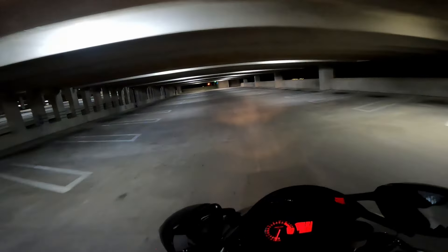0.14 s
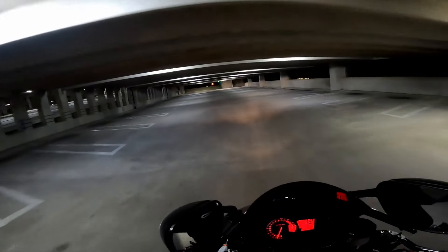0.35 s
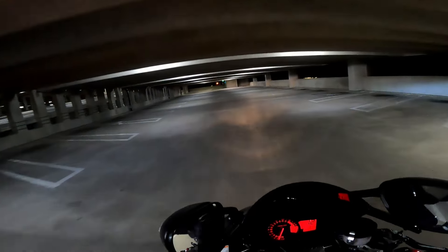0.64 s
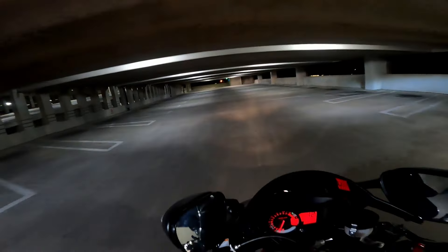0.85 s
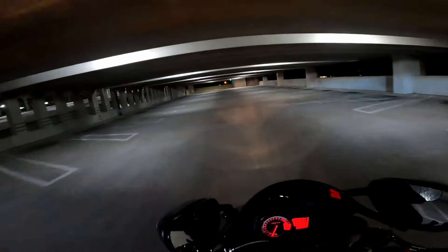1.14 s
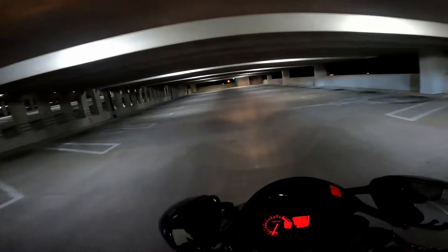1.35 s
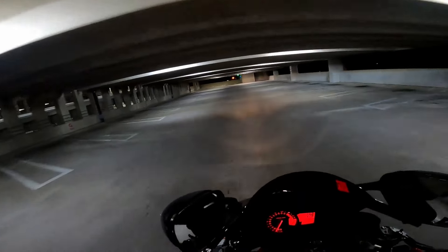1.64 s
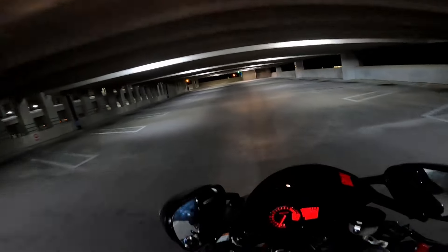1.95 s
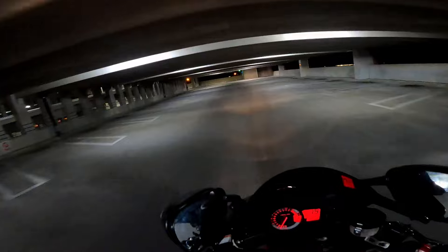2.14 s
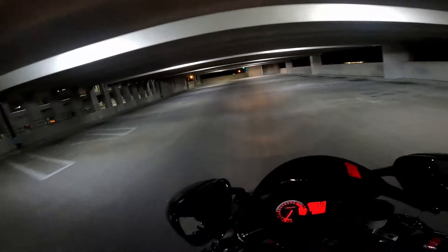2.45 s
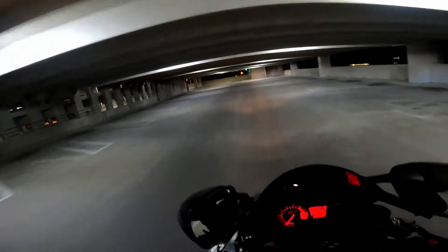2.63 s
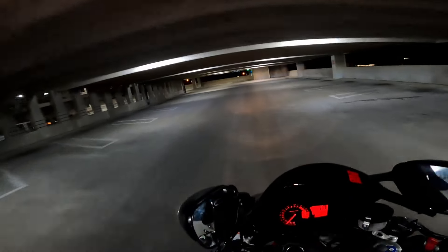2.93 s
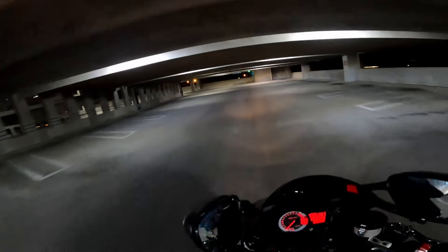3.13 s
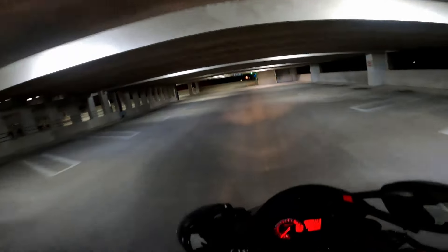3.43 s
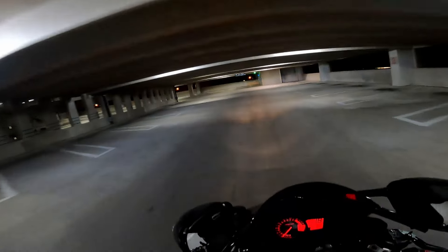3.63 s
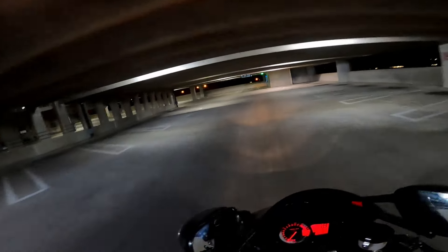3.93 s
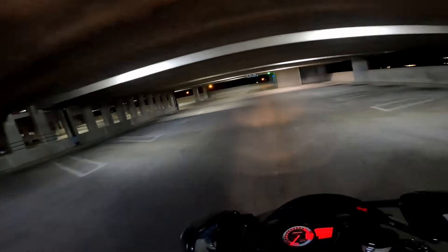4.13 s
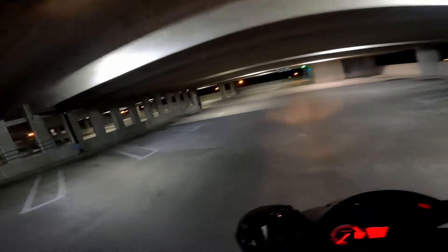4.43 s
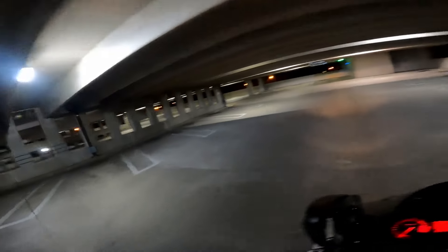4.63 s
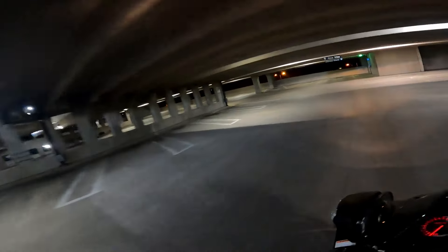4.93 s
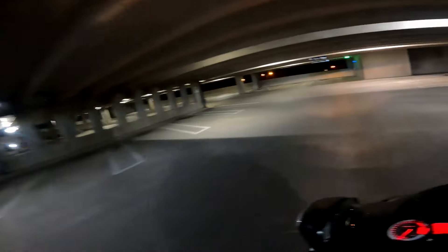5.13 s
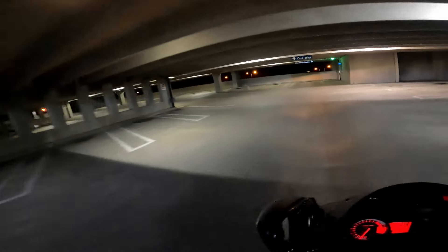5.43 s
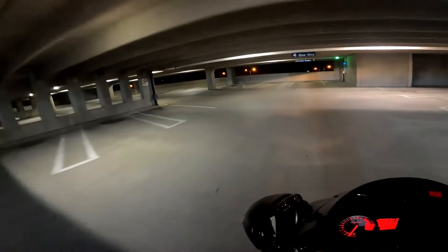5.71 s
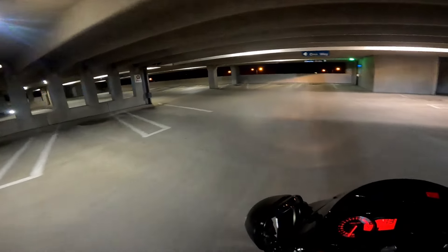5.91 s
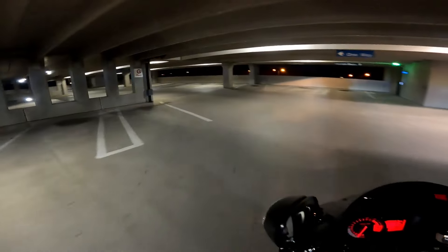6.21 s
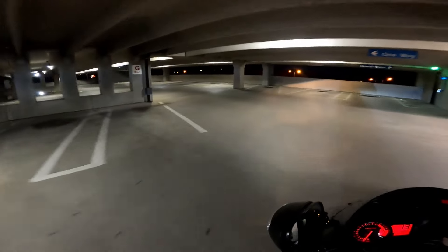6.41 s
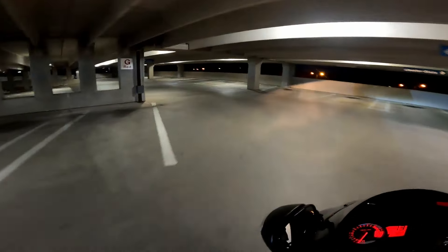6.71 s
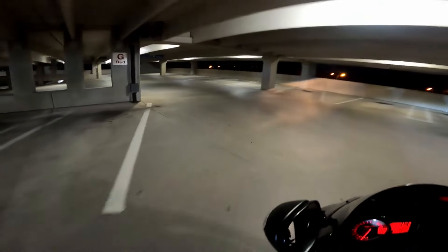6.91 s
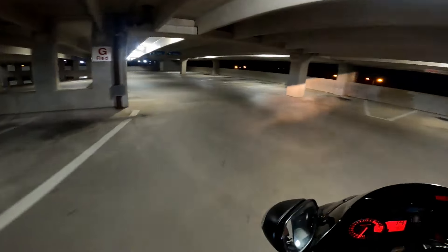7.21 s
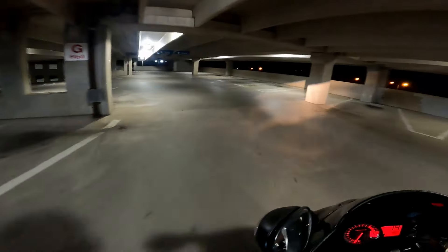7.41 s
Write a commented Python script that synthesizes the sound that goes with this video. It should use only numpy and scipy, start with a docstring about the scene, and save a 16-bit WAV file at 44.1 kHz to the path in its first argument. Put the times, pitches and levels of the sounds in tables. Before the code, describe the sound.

A twin-cylinder sport motorcycle heard from the rider's helmet in a concrete parking garage. The deep droning engine note climbs smoothly for three seconds into a raspy bark, snatches as the throttle closes, then sinks through a bassy, uneven burble with singing gears. Near the end light throttle steadies and slightly lifts the note. Constant mechanical rattle and fluttering concrete reflections surround it.

```python
"""A concrete parking garage, heard from the helmet of a rider on a twin-cylinder sport motorcycle.
It pulls up to about 7900 rpm, coasts down with a burble and whining gears, then takes a little throttle again.
The engine is built from crank orders, firing thumps and gear-tooth tones; filtered noise makes boom, rattle and air.
Beams and pillars return Doppler-shifted echoes that beat against the engine note; a limiter holds the peaks."""
import sys
import numpy as np
from scipy import signal
from scipy.fft import rfft, irfft
from scipy.io import wavfile
from scipy.ndimage import uniform_filter1d, minimum_filter1d

SR = 44100
rng = np.random.default_rng(int(sys.argv[2]) if len(sys.argv) > 2 else 0)


def dump(signal):
    """Clip the signal to [-1, 1] and save it as 16-bit WAV at the path in sys.argv[1]."""
    limited = np.clip(np.atleast_2d(signal).T, -1, 1)
    pcm = np.round(limited * 32767).astype(np.int16)
    wavfile.write(sys.argv[1], SR, pcm)


N = 333396
T = np.arange(N) / SR  # s
HZ = np.fft.rfftfreq(N, 1 / SR)

# crank turns per second at which speed-dependent levels are set, and above which firing grows ragged
STRAIN_HZ = 103
# no two strokes take quite the same time: rms wander of the crank (turns) and its rate (Hz)
WANDER_TURNS, WANDER_HZ = .006, 25


def amp(db):
    """Decibels to gain."""
    return 10 ** (np.asarray(db) / 20)


def unit(x):
    """Scales to rms 1."""
    return x / np.sqrt(np.mean(np.abs(x) ** 2) + 1e-20)


def curve(rows):
    """Every column of a timed table, sample by sample."""
    s, *columns = np.transpose(rows)
    return [np.interp(T, s, column) for column in columns]


def read(points, hz):
    """A spectrum at the given frequencies, interpolated along log frequency."""
    f, value = np.transpose(points)
    return np.interp(np.log(hz + 1), np.log(f + 1), value)


def colour(x, points):
    """Filters by a spectrum, to rms 1."""
    return unit(irfft(rfft(x) * amp(read(points, HZ)), N))


def drift(rate_hz):
    """Smooth chance of rms 1, up to about the given rate."""
    return unit(irfft(rfft(rng.standard_normal(N)) * np.exp(-(HZ / rate_hz) ** 2), N))


def fray(share, rate_hz):
    """A tone's complex gain: partly steady, partly wandering at the given rate."""
    knots = np.arange(0, T[-1] + 1, .5 / rate_hz)
    a, b = rng.standard_normal((len(knots), 2)).T
    wandering = unit(np.interp(T, knots, a + 1j * b))
    return np.sqrt(1 - share) + np.sqrt(share) * wandering


def hump(middle, length):
    """A smooth rise to 1 and fall, as wide as length at half height."""
    return np.exp2(-(2 * (T - middle) / length) ** 2)


def even(x):
    """Levels out the chance lumps of a rumble, keeping its fine grain."""
    window_s, share, floor = .03, .85, .02
    power = signal.oaconvolve((x ** 2).mean(0), signal.windows.hann(int(window_s * SR)), "same")
    return unit(x / (unit(power) + floor) ** (share / 2))


def diffuse(pair):
    """Makes two unrelated noises as alike as a diffuse field at the two microphone ports."""
    # likeness of the ports: frequency_hz, likeness (0-1)
    likeness = [(60, 0.62), (130, 1), (290, 0.85), (640, 0.74), (1410, 0.85), (3100, 0.74), (6820, 0.64),
                (15000, 0.81)]
    a, b = rfft(pair)
    same = np.clip(read(likeness, HZ), 0, 1)
    return irfft(np.array([a, same * a + np.sqrt(1 - same ** 2) * b]), N)


def boom(shut, level_db=-35, shut_db=12, surge_db=-1.0):
    """The space between floor and ceiling resonates below the engine note, most on a shut throttle."""
    # single surges of the low deck: middle_s, length_s, level_db (before surge_db)
    surge_rows = [(0.274, 0.13, -22.5), (1.248, 0.099, -39.5), (4.174, 0.19, -32), (5.554, 0.52, -30.5),
                  (5.91, 0.078, -22.5), (6.457, 0.1, -29.5), (6.954, 0.53, -32.5), (7.523, 0.23, -21.5)]
    # tone of the deck: frequency_hz, relative level (dB per Hz)
    deck_tone = [(8, -29.5), (25, -18.5), (38, -22.5), (50, -4.5), (62, -0.5), (70, 10), (80, -17.5),
                 (120, -36.5), (600, -100)]
    surges = sum(amp(db + surge_db) * hump(s, length) for s, length, db in surge_rows)
    return colour(rng.standard_normal(N), deck_tone) * (amp(level_db + shut_db * shut) + surges)


def clatter(turns, beat=0.029, flicker_db=0.65, waver_db=0.56, waver_hz=14, level_db=12.0):
    """A dense noise of chain, valves and tyres rings metal parts, pulsing slightly with the crank."""
    # level along the ride: time_s, level_db (before level_db is added)
    ride_level = [(0, -47.5), (0.85, -47.5), (2.1, -49), (2.75, -47.5), (3.6, -44), (4.7, -44), (4.95, -45),
                  (5.3, -43.5), (5.9, -44), (6.8, -46), (7.56, -45.5)]
    # tone of chain, valves and tyres: frequency_hz, relative level (dB per Hz)
    rattle_tone = [(300, 11.5), (800, 13.5), (1100, 7.5), (1450, 3), (1950, 4.5), (2600, -0.5), (3800, -5),
                   (4900, -6), (5600, -9), (7400, -14), (8600, -20.5), (11000, -27.5), (12200, -26),
                   (14500, -44.5)]
    # metal parts that the rattle rings: frequency_hz, width_hz, lift_db
    metal_parts = [(960, 33, 3), (1680, 110, 3), (1970, 67, 2.5), (3080, 160, 1.5), (4880, 89, 3.5)]
    pulse = 1 + beat * np.cos(2 * np.pi * turns)
    rattle = rng.standard_normal((2, N)) * pulse * amp(flicker_db * drift(250))
    ring_db = sum(db / (1 + (2 * (HZ - hz) / width) ** 2) for hz, width, db in metal_parts)
    rung = irfft(rfft(rattle) * amp(ring_db), N)
    gain = amp(curve(ride_level)[0] + level_db + waver_db * drift(waver_hz))
    return diffuse(colour(rung, rattle_tone)) * gain


def squeak():
    """One brief metallic squeak: a short swell of pure tone."""
    # the squeak: middle_s, length_s, pitch_hz, level_db
    ring = (7.33, .045, 1995, -45)
    s, length, hz, db = ring
    return np.sqrt(2) * amp(db) * hump(s, length) * np.sin(2 * np.pi * hz * T)


def intake(turns, octaves, shut, speed_db=7, gulp=0.24, level_db=-45.0, shut_db=-9):
    """Air hisses into the engine in gulps, harder the faster it turns and the wider the throttle is open."""
    # air drawn through the throttle: frequency_hz, relative level (dB per Hz)
    air_tone = [(300, -28.5), (900, -0.5), (1350, 4.5), (1800, -9.5), (3200, -24.5), (4500, -23.5),
                (12000, -63)]
    air = colour(rng.standard_normal((2, N)), air_tone) * (1 + gulp * np.cos(2 * np.pi * turns))
    return diffuse(air) * amp(level_db + speed_db * octaves + shut_db * shut)


def airbox(turns, octaves, shut, hz=830, width_hz=170, gulp=0.33, level_db=-43, speed_db=16, shut_db=-22):
    """The airbox honks with each gulp, a band of noise strongest at high speed and open throttle."""
    honk = unit((fray(1, width_hz) * np.exp(2j * np.pi * hz * T)).real)
    gulps = 1 + gulp * np.cos(2 * np.pi * turns)
    return honk * gulps * amp(level_db + speed_db * octaves + shut_db * shut)


def gears(turns, speed, shut, level_db=-51.0, speed_db=5, shut_db=-0.3):
    """Teeth sing where they cross a casing resonance, louder when fast; backlash frays them and adds chatter."""
    # gear teeth: crank_order, relative level_db
    teeth = [(16, -6), (17, -2), (18, 5), (19, 2), (20, -2), (59, -22), (71, -31)]
    # resonances of the gear casing: frequency_hz, relative level_db
    casing = [(1500, -14), (1830, -10), (1930, -2), (2050, -2.5), (2190, -2.5), (2320, -12), (4500, -15),
              (6200, -1.5), (8800, 8)]
    # the gears chatter at speed and sing out while the wheel drives the engine:
    # time_s, chatter centre_hz, chatter level_db, tooth tone lift_db
    whine = [(1.6, 1850, -68, 0), (2.05, 1990, -54.5, 0), (2.45, 2100, -50.5, -1), (2.8, 2150, -54, -4),
             (3.1, 2150, -55, -2), (3.6, 2070, -49.5, 3), (4.15, 2070, -51, 6), (4.55, 2000, -49.5, 8),
             (4.79, 1985, -48.5, 9), (4.88, 1990, -53, -1), (5.35, 2010, -48.5, -1), (5.9, 1950, -53, 0),
             (6.5, 1930, -58, 0)]
    backlash, backlash_hz_per_order, chatter_hz = .45, 2.0, 130
    centre_hz, chatter_db, lift_db = curve(whine)
    shaft = turns + WANDER_TURNS * drift(WANDER_HZ)
    tones = np.zeros(N)
    for order, db in teeth:
        share = np.clip(backlash * order / teeth[0][0], 0, 1)
        tone = fray(share, backlash_hz_per_order * order) * np.exp(2j * np.pi * order * shaft)
        tones += amp(db + read(casing, order * speed)) * tone.real
    tones_db = level_db + speed_db * np.log2(speed / STRAIN_HZ) + shut_db * shut + lift_db
    chatter = unit((fray(1, chatter_hz) * np.exp(2j * np.pi * np.cumsum(centre_hz) / SR)).real)
    return tones * amp(tones_db) + chatter * amp(chatter_db)


def burble(turns, shut, wash=1.0, level_db=-24.0, shut_db=8.0, light_db=4.5):
    """Firings of random strength thump the pipe, least at full throttle; the garage adds a wash of noise."""
    # uneven firing, spread by the garage: frequency_hz, relative level (dB per Hz)
    firing_tone = [(15, -25), (45, -20), (70, -18), (92, -4.5), (125, -1.5), (150, -6), (185, 2.5),
                   (212, 2.5), (243, 2.5), (288, -6), (330, -10), (372, -3.5), (435, -11.5), (510, -13),
                   (650, -22.5), (1100, -69.5), (3000, -100)]
    # two cylinders, each firing every other turn, 3/8 of a cycle apart
    cycle = turns / 2
    first_fires = np.diff(np.floor(cycle), prepend=0)
    second_fires = np.diff(np.floor(cycle + 3 / 8), prepend=0)
    fires = (first_fires + second_fires) > 0
    # minimum phase gives the thump a sharp start and a ringing end
    log_gain = np.log(amp(read(firing_tone, np.abs(np.fft.fftfreq(4096, 1 / SR)))))
    thump = np.fft.ifft(np.exp(np.conj(signal.hilbert(log_gain)))).real
    thumps = unit(signal.oaconvolve(fires * rng.uniform(-0.79, 1, N), thump)[:N])
    washed = thumps + wash * diffuse(colour(rng.standard_normal((2, N)), firing_tone))
    gain = amp(level_db + shut_db * shut + light_db * np.sin(np.pi * shut) ** 2)
    return even(washed) * gain


def swell(order):
    """Decibels added to one crank order: passing echoes swell or cancel it, the note stumbles as the throttle
    shuts, and the upper orders growl at the rev peak."""
    # swells and dips of the engine note: middle_s, length_s, crank_order, change_db
    swell_rows = [(0.022, 0.17, 3, -15), (0.047, 0.043, 4, 3.5), (0.102, 0.31, 2, 6),
                  (0.287, 0.039, 1, -12.5), (0.39, 0.073, 2, -8.5), (0.47, .4, 6, -6.5),
                  (0.52, 0.088, 2, 3), (0.764, 0.049, 2, 7.5), (0.868, 0.11, 3, 3.5), (0.879, 0.088, 1, 3),
                  (0.887, 0.15, 2, -9), (0.948, 0.27, 5, -4.5), (1.031, 0.097, 2, 8),
                  (1.142, 0.033, 2, -7.5), (1.38, 0.047, 2, -3), (1.475, 0.044, 2, 6), (1.6, 0.4, 6, -3.5),
                  (1.7, .3, 2, 1), (2.004, 0.25, 3, 12), (2.147, 0.029, 2, 10.5), (2.282, 0.43, 4, 3.5),
                  (2.263, 0.066, 2, -6.5), (2.359, 0.058, 2, 6.5), (2.502, 0.067, 2, 5.5),
                  (2.54, .025, 2, -5.5), (2.581, 0.15, 1, -2), (2.6, 0.089, 7, 1), (2.699, 0.41, 3, 1.5),
                  (2.717, 0.14, 2, 4), (2.977, 0.045, 1, -5), (2.884, 0.16, 7, 8), (3.062, 0.099, 6, 3.5),
                  (3.086, 0.16, 5, 7.5), (3.119, 0.062, 3, 9), (3.135, 0.092, 1, -9), (3.233, .05, 1, 5),
                  (3.3, 0.043, 1, -15.5), (3.422, 0.048, 1, -16), (3.605, 0.69, 2, -14.5),
                  (3.827, 0.27, 1, 1.5), (4.223, 0.13, 1, 0), (4.247, 0.053, 2, -8), (4.55, 0.2, 2, 3),
                  (4.543, 0.05, 1, -7), (5.097, 0.027, 2, -7), (5.326, 0.22, 2, -3.5), (5.55, 0.039, 2, -7),
                  (5.8, 0.21, 2, -8), (6.105, .8, 4, -0.5), (6.233, 0.21, 2, -5.5), (6.508, 0.11, 3, 8),
                  (6.55, 0.16, 7, 8), (6.598, 0.56, 1, 0.5), (6.689, 0.089, 2, 8), (6.796, 0.083, 2, -25.5),
                  (6.784, 0.052, 4, 9.5), (7.008, 0.079, 2, 1.5), (7.014, 0.1, 1, -11.5),
                  (7.097, 0.079, 4, 9.5), (7.179, 0.048, 2, 5), (7.313, 0.074, 2, -7), (7.252, 0.85, 3, -8),
                  (7.452, 0.2, 4, -1), (7.428, 0.12, 1, -2.5)]
    return sum(db * hump(s, length) for s, length, k, db in swell_rows if round(k) == order)


def bark(turns, speed, shut, half_db=-14.0, half_ragged_db=9, odd_db=-1.5, ragged_hz=22, scatter=0.56,
         level_db=4.5, shut_db=-19):
    """Firing rings the pipe; each cylinder fires every other turn, adding half orders, more when ragged."""
    # exhaust pipe and airbox: frequency_hz, level_db of a crank order there (before the changes below)
    pipe = [(150, -33), (205, -23), (245, -25), (290, -34.5), (340, -27), (410, -24), (460, -37),
            (505, -33), (550, -29), (595, -29.5), (630, -35.5), (660, -32), (710, -39), (760, -34.5),
            (800, -40), (850, -50), (950, -43.5), (1200, -65), (2000, -96)]
    # more rasp when fast and open: tilt about 400 Hz (dB per octave), its gain per octave of speed, when shut
    rasp_db, rasp_speed_db, rasp_shut_db = 2, 19.5, -14
    # steady under load; ragged on a shut throttle, at strain and in the high orders (raggedness 0-1)
    ragged_open, ragged_shut, ragged_per_hz, ragged_per_order = .005, .85, .016, .008
    # the orders break up as the bike moves through the garage: share 0-1, rate (Hz)
    breakup, breakup_hz = .025, 7
    rasp = rasp_db + rasp_speed_db * np.log2(speed / STRAIN_HZ) + rasp_shut_db * shut
    ragged = ragged_open + ragged_shut * shut + ragged_per_hz * np.maximum(speed - STRAIN_HZ, 0)
    crank = turns + WANDER_TURNS * drift(WANDER_HZ)
    out = np.zeros(N)
    for k in np.arange(3, 23) / 2:
        if k != 2:  # the second order belongs to the drone
            db = read(pipe, k * speed) + rasp * np.log2(k * speed / 400) + swell(order=k)
            db += (half_db + half_ragged_db * ragged) * (k % 1 > 0) + odd_db * (k % 2 == 1)
            # suction pulses; the pipe delays each order differently
            smear = .5 + scatter * rng.uniform(-0.51, 0.51)
            share = np.minimum(ragged + ragged_per_order * k, ragged_shut)
            frayed = fray(share, ragged_hz) * fray(breakup, breakup_hz)
            out += amp(db) * (frayed * np.exp(2j * np.pi * (k * crank + smear))).real
    return np.sqrt(2) * out * amp(level_db + shut_db * shut)


def drone(turns, speed, shut, first_db=0.0, second_db=1.0, first_shut_db=-4.0, second_shut_db=-4):
    """The first two crank orders make one deep pulse a turn, waver with the ride and stumble when shut."""
    # exhaust resonances that the orders sweep: frequency_hz, level_db of an order there (before changes)
    resonances = [(75, -19), (81, -13.5), (87, -18), (94, -19), (108, -14.5), (120, -11), (130, -11),
                  (160, -21.5), (183, -12), (198, -14), (215, -14.5), (238, -17.5), (255, -20)]
    # the note wavers as the bike moves: first and second order (rms dB), rate (Hz)
    waver_first_db, waver_second_db, waver_hz = 0.9, 1.1, 11
    first_stumble, second_stumble, stumble_hz = .04, .4, 32
    first = read(resonances, speed) + first_db + first_shut_db * shut
    first = first + waver_first_db * drift(waver_hz) + swell(order=1)
    second = read(resonances, 2 * speed) + second_db + second_shut_db * shut
    second = second + waver_second_db * drift(waver_hz) + swell(order=2)
    spin = np.exp(2j * np.pi * turns)
    once = amp(first) * fray(first_stumble * shut ** 2, stumble_hz) * spin
    twice = amp(second) * fray(second_stumble * shut ** 2, stumble_hz) * spin ** 2 * np.exp(-1j * np.pi / 4)
    return -np.sqrt(2) * (once + twice).real


def garage(x, doppler=0.032, mean_delay=.09, life=.9, port_lag=0.000085, count=60):
    """Echoes come and go as beams and pillars pass: those ahead return sharp, those behind flat."""
    out, sideways = np.zeros((2, N))
    x = x * np.sin(np.pi / 2 * np.minimum(T * 50, 1)) ** 2  # the echoes set in softly
    for i, (bearing, distance) in enumerate(rng.random((count, 2))):
        middle = T[-1] * (i + .5) / count
        near = slice(max(int((middle - life) * SR), 0), int((middle + life) * SR))
        since = T[near] - middle
        # the changing delay (s) shifts the pitch
        delay = doppler * life - mean_delay * np.log(1 - distance) + doppler * np.cos(2 * np.pi * bearing) * since
        echo = np.cos(np.pi / 2 * since / life) * np.interp(np.abs(T[near] - delay), T, x)
        out[near] += echo
        sideways[near] += echo * np.sin(2 * np.pi * bearing)
    early = port_lag * SR * np.gradient(sideways)  # an echo from the side reaches one port first
    return np.array([out + early, out - early]) * np.sqrt(T[-1] / (count * life))


def ports(mix):
    """The two microphone ports hear slightly different level and phase; the sound drifts left along the ride."""
    # level between ports: frequency_hz, left minus right (dB)
    tilt = [(60, 1.1), (160, 1.4), (330, 1.6), (650, 1.9), (1300, 1.8), (2500, 1), (5000, 1.3), (9000, 1.8)]
    # phase between ports: frequency_hz, lead of the left (radians)
    lead = [(60, -.05), (180, -.18), (330, -.32), (650, -.45), (2300, -.62), (6300, -.1), (12000, 0)]
    drift_db_per_s = .13  # left minus right
    port = amp(read(tilt, HZ) / 2) * np.exp(.5j * read(lead, HZ))
    lean = amp(drift_db_per_s * (T - T.mean()) / 2)
    return irfft(rfft(mix) * np.array([port, 1 / port]), N) * np.array([lean, 1 / lean])


def scene(drone_echo_db=-17, bark_echo_db=-7, burble_speed_db=-5, boom_speed_db=-13):
    """Crank speed and throttle drive the engine sounds; the rumble eases per octave of speed."""
    # the crank flares and snatches back as the throttle shuts: time_s, crank speed_hz (turns per second)
    crank_speed = [(0, 76.6), (0.25, 80.4), (0.8, 84.5), (1.8, 94.3), (2.2, 101.1), (2.8, 119.4),
                   (3.0, 127.5), (3.12, 131), (3.25, 121.5), (3.42, 126.3), (4.2, 112.1), (5.0, 98.6),
                   (5.75, 86.5), (6.2, 88.6), (6.4, 88.2), (6.8, 91.7), (7.2, 93.8), (7.56, 93.7)]
    # the rider's hand: time_s, throttle opening (0-1)
    throttle = [(0, 1), (.8, 0.93), (1.3, 0.78), (2.3, 0.84), (3.16, 0.65), (3.25, 0.3), (4.9, 0.12),
                (5.9, 0.57), (6.8, 0.76), (7.2, 0.69), (7.56, 0.6)]
    speed, = curve(crank_speed)
    shut = 1 - np.clip(curve(throttle)[0], 0, 1)
    turns, octaves = np.cumsum(speed) / SR, np.log2(speed / STRAIN_HZ)
    low, high = drone(turns, speed, shut), bark(turns, speed, shut)
    echoes = garage(amp(drone_echo_db) * low + amp(bark_echo_db) * high)
    rumble = burble(turns, shut) * amp(burble_speed_db * octaves) + boom(shut) * amp(boom_speed_db * octaves)
    mix = low + high + echoes + rumble + intake(turns, octaves, shut) + airbox(turns, octaves, shut)
    mix = mix + gears(turns, speed, shut) + clatter(turns) + squeak()
    fade_s = .006  # soft start and end
    mix = mix * np.sin(np.pi / 2 * np.minimum(np.minimum(T, T[-1] - T) / fade_s, 1)) ** 2
    return ports(mix)


def record(dry, threshold_db=-4.0, ratio=4, recover_db_per_s=60):
    """A look-ahead peak limiter ducks everything under the loudest swells; then the treble is cut off."""
    edge_hz = 15000
    level_db = 20 * np.log10(np.abs(dry).max(0) + 1e-9)
    over_db = np.maximum(level_db - threshold_db, 0) * (1 - 1 / ratio)
    held_db = -minimum_filter1d(-over_db, size=200)
    fall = T * recover_db_per_s
    duck_db = uniform_filter1d(np.maximum.accumulate(held_db + fall) - fall, size=200)
    low_pass = signal.firwin(511, edge_hz, window=("kaiser", 9), fs=SR)
    return signal.oaconvolve(dry * amp(-duck_db), low_pass[None], "same")


dry = scene()
out = record(dry)
dump(out)
```